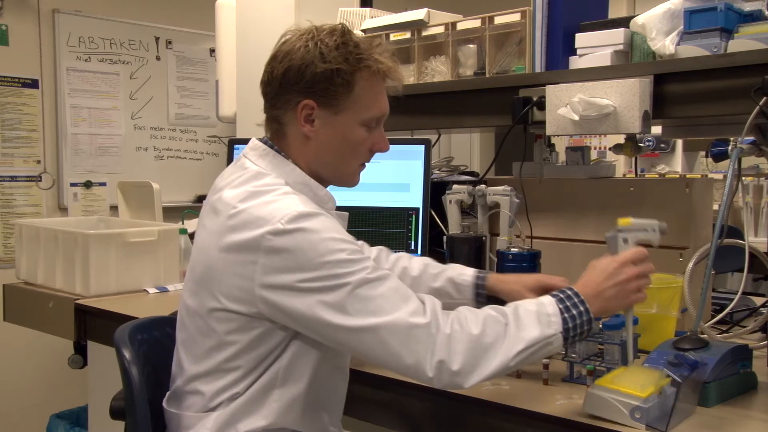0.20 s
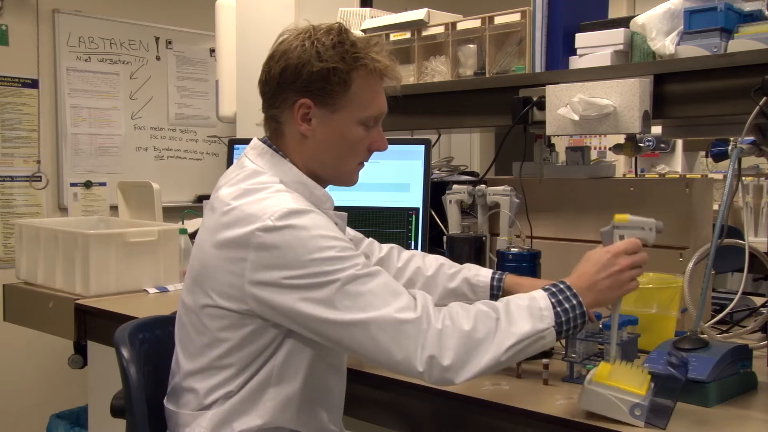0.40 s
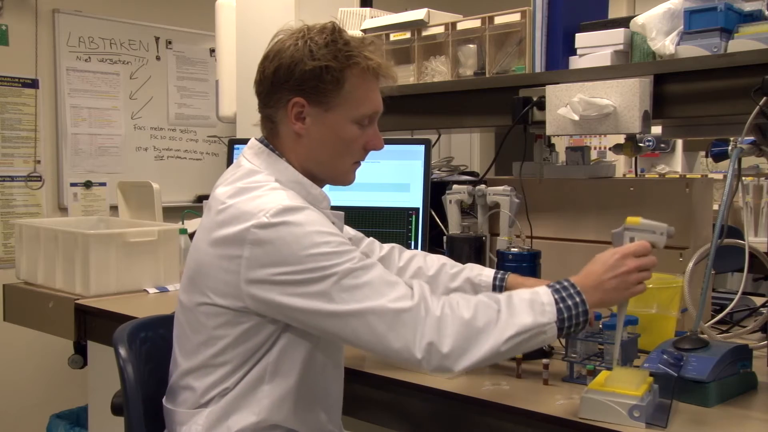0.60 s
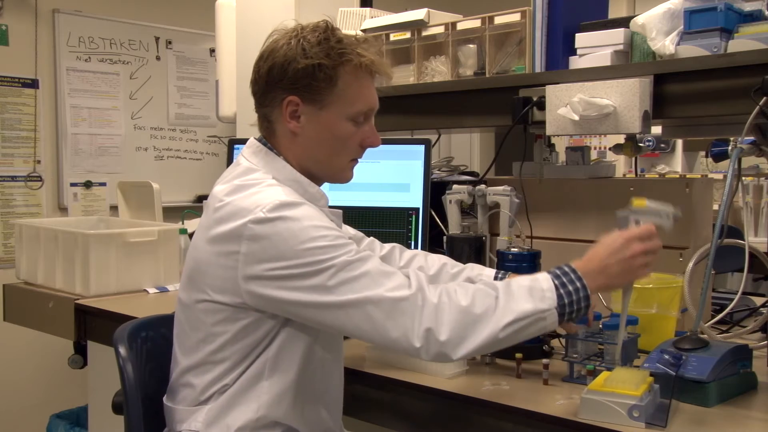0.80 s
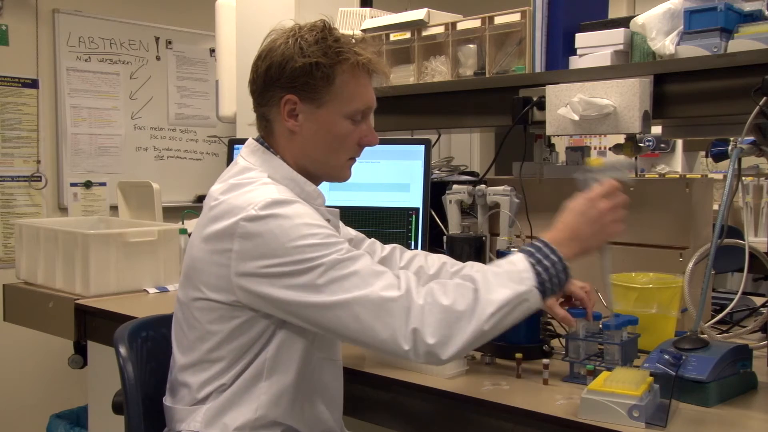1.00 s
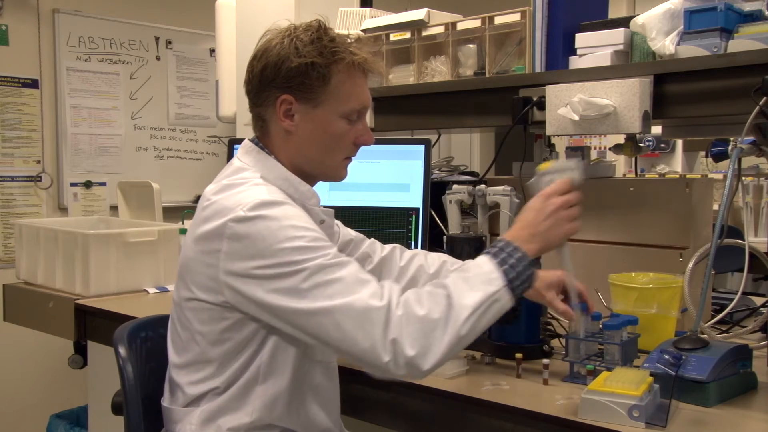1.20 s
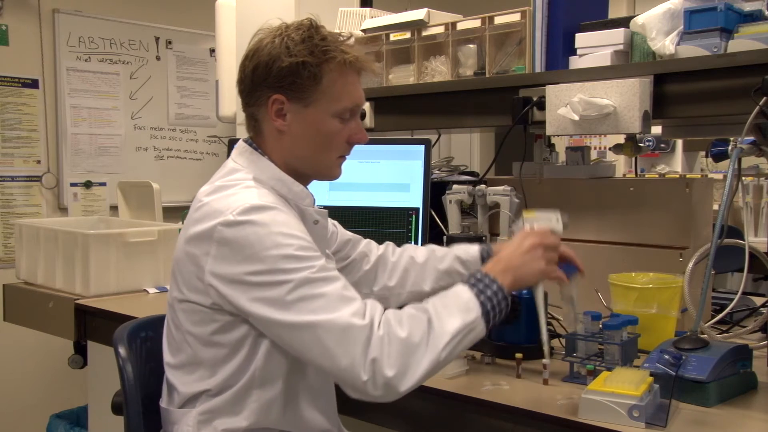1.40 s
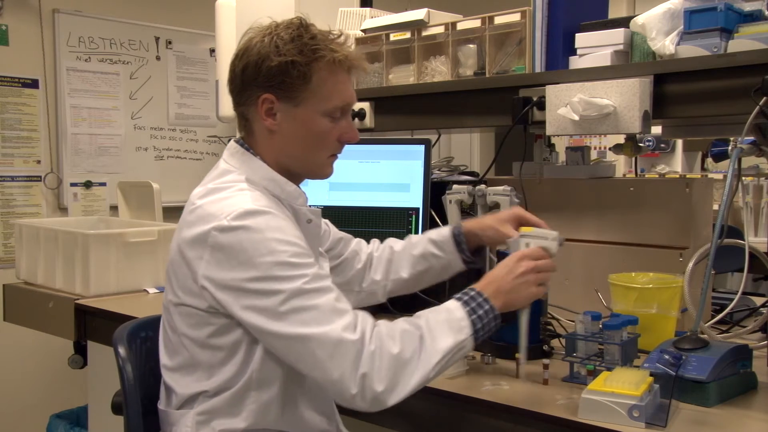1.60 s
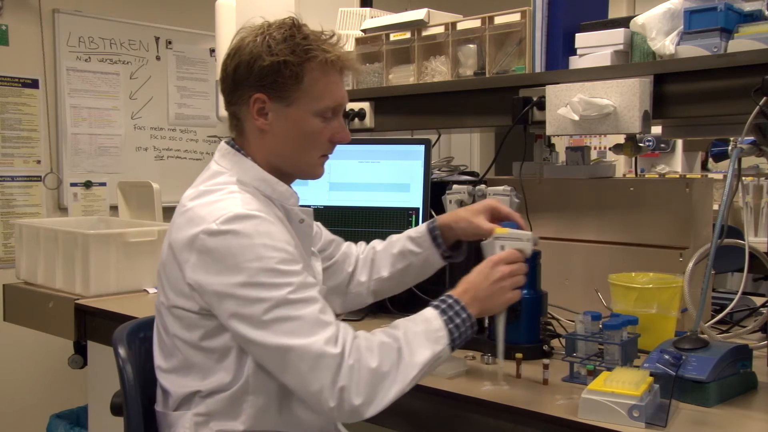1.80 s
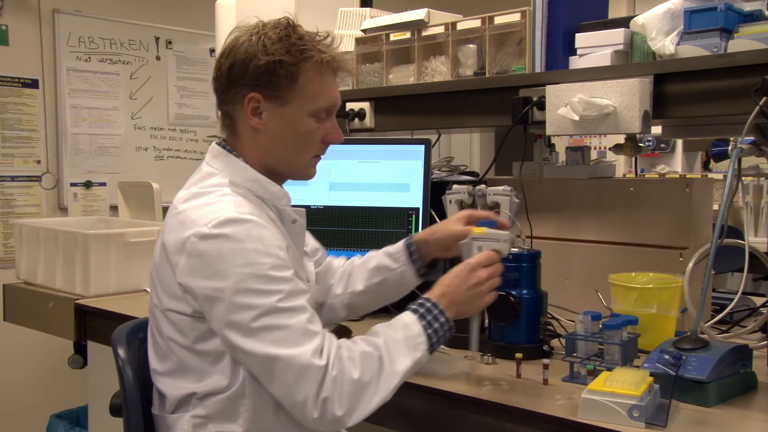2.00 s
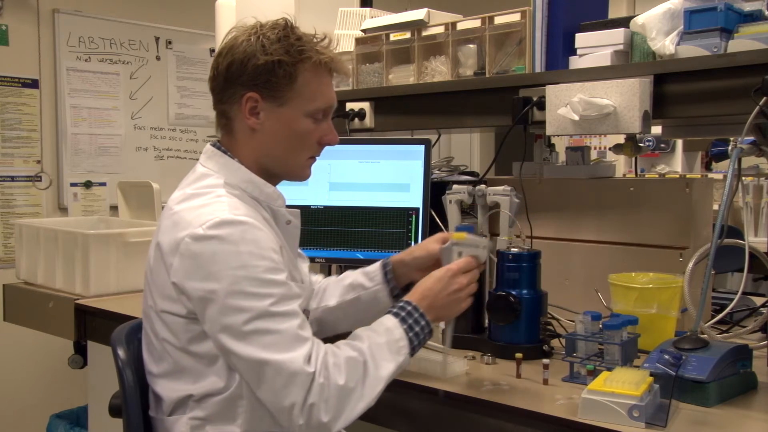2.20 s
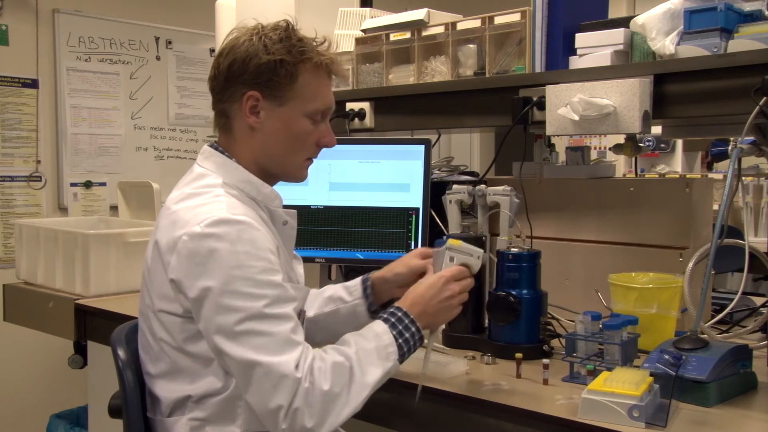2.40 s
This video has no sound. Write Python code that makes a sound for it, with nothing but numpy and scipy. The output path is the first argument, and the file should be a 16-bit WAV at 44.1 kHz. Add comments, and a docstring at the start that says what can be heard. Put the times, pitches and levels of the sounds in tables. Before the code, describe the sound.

A pipette knocks and rattles into a hollow plastic tip rack, then small ticks over equipment hum

```python
"""A lab bench in a small room: a pipette is pressed into a plastic tip rack, which knocks, rattles and settles.
Struck modes ring the rack and coloured noise clatters over them; two hollow taps follow as the tip is lifted.
The pipette ticks and scrapes in the hands, with soft bumps and rustling sleeves of swelling noise.
Lab equipment hums over ventilation noise; two close microphone ports hear it all."""
import sys
import numpy as np
from scipy import signal
from scipy.fft import rfft, irfft
from scipy.io import wavfile
from scipy.ndimage import uniform_filter1d

SR = 44100
rng = np.random.default_rng(int(sys.argv[2]) if len(sys.argv) > 2 else 0)


def wrap_up_sound(samples):
    """Save the sound to the file named by the first command line argument, as 16-bit audio."""
    columns = np.atleast_2d(samples).T
    # keep every value between -1 and 1, then stretch to whole-number steps
    tamed = np.clip(columns, -1, 1)
    steps = np.round(tamed * 32767).astype(np.int16)
    wavfile.write(sys.argv[1], SR, steps)


N = 110250  # 2.5 s

# colours of the dense plastic resonances, low and middle range: freq_hz, relative level_db (per Hz)
CLATTER_COLOUR = [(40, -45), (120, -24), (280, -12), (480, -9), (640, -1.5), (1000, -3), (1250, -16.5),
                  (1500, -16), (2200, -40), (8000, -85)]
CRACK_COLOUR = [(100, -62), (900, -39), (1450, 4), (1950, -0.5), (2400, 4.5), (3800, 1), (4300, -4),
                (4700, -14), (7000, -26), (15000, -76)]
ATTACK_S = 0.00027  # shortest rise of any blow
LEFT_RIGHT = np.array([[1], [-1]])  # puts a signal in opposite polarity on the two sides


def undb(db):
    """Amplitude factor from decibels."""
    return 10 ** (np.asarray(db) / 20)


def curve(points):
    """Gain at each frequency, drawn through (Hz, dB) points on a log frequency scale."""
    hz, db = np.array(points, float).T
    bins_hz = np.arange(N // 2 + 1) * SR / N
    return undb(np.interp(np.log(bins_hz + 1), np.log(hz), db))


def filtered(x, points):
    """A signal shaped by a gain curve."""
    return irfft(rfft(x) * curve(points), N)


def noise(points):
    """Noise of a given colour, rms 1."""
    x = filtered(rng.standard_normal(N), points)
    return x / x.std()


def wide(points, side_db):
    """Noise that partly differs between left and right."""
    middle, side = noise(points), undb(side_db) * noise(points)
    return (middle + side * LEFT_RIGHT) / np.sqrt(1 + undb(side_db) ** 2)


def since(start_s):
    """Seconds since a moment, zero before it."""
    return np.maximum(np.arange(N) / SR - start_s, 0)


def fade(t, t60_s):
    """Exponential decay by 60 dB in t60_s."""
    return np.exp(-np.log(1000) * t / t60_s)


def blow(start_s, hold_s, t60_s):
    """Envelope of a blow: quick attack, hold while the parts touch, then decay."""
    t = since(start_s)
    return np.minimum(t / ATTACK_S, 1) * fade(np.maximum(t - hold_s, 0), t60_s)


def ring(start_s, hz, t60_s):
    """One struck mode: a decaying sine, followed down to -60 dB."""
    out = np.zeros(N)
    i = np.arange(int(start_s * SR) + 1, min(int((start_s + t60_s) * SR), N))
    t = i / SR - start_s
    out[i] = np.sin(2 * np.pi * hz * t) * fade(t, t60_s)
    return out


def modes(start_s, table, rise_s):
    """Struck modes that build up while the contact lasts."""
    ringing = sum(undb(db) * ring(start_s, hz, t60_s) for hz, db, t60_s in table)
    return ringing * np.minimum(since(start_s) / max(rise_s, ATTACK_S), 1)


def swells(rows, colour):
    """Soft rubbing: coloured noise that swells and dies away in bell-shaped bursts."""
    t = np.arange(N) / SR
    bursts = sum(undb(db) * np.exp(-((t - centre_s) / half_s) ** 2) for centre_s, half_s, db in rows)
    return noise(colour) * bursts


def equipment():
    """A motor tone whose level wavers slightly and a faint mains hum, over broadband ventilation."""
    # colour of the ventilation: freq_hz, relative level_db (per Hz)
    air_colour = [(15, -2), (30, -18), (52, 1.5), (75, -9.5), (105, 2.5), (160, -7.5), (250, -10.5),
                  (430, -11.5), (600, -15.5), (1000, -23), (2000, -31.5), (4000, -41), (6300, -41.5),
                  (8000, -47), (10500, -44.5), (15500, -49.5)]
    # part of the ventilation that differs between left and right: freq_hz, gain_db
    air_side_gain = [(25, -13), (60, -14), (125, -20), (250, -24), (1000, -35), (4000, -14.5), (10000, -6)]
    motor_hz, motor_db, waver_db = 216.55, -47.5, 0.38  # levels and waver are rms
    mains_hz, mains_db = 98, -66
    air_db = -52
    t = np.arange(N) / SR
    waver = noise([(2, 0), (8, -15), (30, -80)])  # slow random drift
    motor = undb(motor_db + waver_db * waver) * np.sin(2 * np.pi * motor_hz * t)
    mains = undb(mains_db) * np.sin(2 * np.pi * mains_hz * t)
    air = noise(air_colour) + filtered(noise(air_colour), air_side_gain) * LEFT_RIGHT
    return np.sqrt(2) * (motor + mains) + undb(air_db) * air  # sqrt(2) turns rms into sine peak


def sleeves():
    """Cloth rubbing on cloth gives swells of broadband rustle."""
    # sleeve rustles: centre_s, half_length_s, level_db
    rustle_rows = [(0.13, 0.21, -55.5), (0.37, 0.068, -62), (1.34, .05, -77), (2.085, 0.037, -65),
                   (2.28, 0.58, -66)]
    # colour of the cloth: freq_hz, relative level_db (per Hz)
    cloth_colour = [(300, 18), (900, 13), (2000, 7), (4000, 0.5), (6500, -1), (8000, -5.5), (10500, 1.5),
                    (15500, -23)]
    return swells(rustle_rows, cloth_colour)


def rack():
    """Knocks ring the box, lid and tip tray and shake the loose tips; thuds and a bench boom lie beneath."""
    # knocks: start_s, box_db, lid_db, tray_db, clatter_db, crack_db, snap_db, contact_s
    knock_rows = [(0.142, -52, -62, -42.5, -52, -64, -68, 0.015),
                  (0.203, -60, -67, -42, -43.5, -55.5, -56, .003),
                  (0.2234, -37.5, -61, -61, -41, -62.5, -85, 0.007),
                  (0.4243, -33, -40, -34.5, -32, -45, -58.5, 0.0092),
                  (0.4722, -33, -17.5, -20.5, -26.5, -28, -37, 0.006),
                  (0.4978, -34, -40, -22.5, -29, -37, -44, 0.013),
                  (0.518, -29, -37, -28, -34.5, -48.5, -55, 0.026),
                  (0.5652, -34.5, -33, -32.5, -26.5, -40.5, -41.5, 0.0024),
                  (0.581, -53, -46, -46, -37, -50, -44, 0.004),
                  (0.592, -40.5, -53, -48, -41.5, -49, -57.5, 0.015),
                  (0.626, -36.5, -50, -50, -36, -49.5, -52, 0.0046),
                  (0.639, -43.5, -55, -43, -44, -58, -59, 0.0017),
                  (0.658, -43.5, -48, -65, -52, -55, -82, 0.0022)]
    # modes of the hollow box, of its lid and of the tray that holds the tips: pitch_hz, level_db, t60_s
    box_modes = [(438.5, -10.5, .22), (575.8, 3.5, 0.2), (647, -7.5, 0.57), (795, -12.5, 0.42),
                 (1049, -9.5, 0.37)]
    lid_modes = [(619, -2.5, 0.14), (715, -8, 0.18), (769, -16, 0.21), (2960, -8.5, 0.063),
                 (4190, -8.5, 0.049)]
    tray_modes = [(939.6, -1, 0.088), (969.6, -7.5, 0.3), (1093, -6.5, 0.12), (1191, -6.5, 0.1),
                  (1295, -10.5, 0.095), (2247, -19, 0.19)]
    # colour of the brightest plastic resonances: freq_hz, relative level_db (per Hz)
    snap_colour = [(300, -60), (3200, -14), (4700, -0.5), (6800, 2.5), (7700, -8.5), (9500, -4),
                   (11500, -13), (13500, -15), (15500, -37)]
    # colour of the bench boom: freq_hz, relative level_db (per Hz)
    bench_colour = [(30, -16), (60, -7), (100, 2.5), (160, -2), (280, 2), (400, -22), (700, -34),
                    (5000, -86)]
    # thuds into the bench as the tip seats: start_s, level_db, pitch_hz, t60_s
    thud_rows = [(0.475, -32, 313, 0.024), (0.5654, -17.5, 820, 0.017)]
    clatter_t60_s, crack_t60_s, snap_t60_s = 0.056, 0.068, 0.06
    bench_start_s, bench_db, bench_t60_s = 0.54, -43.5, 0.81
    out = np.zeros((2, N))
    clatter, crack = noise(CLATTER_COLOUR), noise(CRACK_COLOUR)
    snap = wide(snap_colour, -13)
    for start_s, box_db, lid_db, tray_db, clatter_db, crack_db, snap_db, contact_s in knock_rows:
        out += undb(box_db) * modes(start_s, box_modes, contact_s)
        # lid and tray build up twice as fast as the box
        out += undb(lid_db) * modes(start_s, lid_modes, contact_s / 2)
        out += undb(tray_db) * modes(start_s, tray_modes, contact_s / 2)
        out += undb(clatter_db) * clatter * blow(start_s, contact_s, clatter_t60_s)
        out += undb(crack_db) * crack * blow(start_s, contact_s, crack_t60_s)
        out += undb(snap_db) * snap * blow(start_s, contact_s, snap_t60_s)
    out += undb(bench_db) * noise(bench_colour) * blow(bench_start_s, 0, bench_t60_s)
    thuds = sum(undb(db) * ring(start_s, hz, t60_s) for start_s, db, hz, t60_s in thud_rows)
    return out - thuds  # the thuds first swing negative


def pipette_ticks():
    """Small contacts in the pipette: short dry noise bursts that also ping its shell."""
    # ticks: start_s, clatter_db, crack_db, snap_db, ping_db
    tick_rows = [(0.6826, -60, -53, -51, -75), (0.7531, -60, -58, -55.5, -55), (0.82, -60, -67, -63.5, -75),
                 (0.9125, -58, -64, -57, -68), (0.919, -47.5, -63.5, -59.5, -67),
                 (1.1503, -50, -66, -54, -72), (1.1732, -64, -72, -67, -78), (1.2217, -46, -62.5, -66, -78),
                 (1.289, -75, -62, -63, -62), (1.9796, -53.5, -60.5, -67, -58.5),
                 (2.0531, -55, -53, -54, -50), (2.083, -77, -56, -72, -61), (2.1, -56, -62, -81, -72),
                 (2.255, -68, -64, -74, -57), (2.271, -51, -56.5, -59.5, -59),
                 (2.4521, -59, -59.5, -63, -70)]
    # colour of the bright edge of a tick: freq_hz, relative level_db (per Hz)
    edge_colour = [(300, -51), (3200, -12), (4700, 3.5), (6800, 3.5), (8000, -4), (9800, 2.5), (12500, -5),
                   (15500, -5)]
    # modes of the pipette's shell: pitch_hz, level_db, t60_s
    shell_modes = [(3020, -10, 0.072), (3910, 2.5, 0.026)]
    hold_s, t60_s = 0.0014, 0.021
    colours = [noise(CLATTER_COLOUR), noise(CRACK_COLOUR), noise(edge_colour)]
    out = np.zeros(N)
    for start_s, *levels_db, ping_db in tick_rows:
        burst = sum(undb(db) * colour for db, colour in zip(levels_db, colours))
        out += blow(start_s, hold_s, t60_s) * burst
        out += undb(ping_db) * modes(start_s, shell_modes, hold_s)
    return out


def scrapes():
    """Loose plastic parts rub on each other in the grip, in short uneven grains."""
    # scrapes: centre_s, half_length_s, level_db
    scrape_rows = [(0.88, 0.016, -69), (1.345, 0.051, -65.5), (2.085, 0.038, -69), (2.28, .04, -73.5),
                   (2.38, 0.012, -71)]
    # colour of rubbed plastic: freq_hz, relative level_db (per Hz)
    scrape_colour = [(1200, -16), (2400, -8), (3000, -3), (3450, -4), (3950, -3), (4700, -3), (7000, -11),
                     (12000, -16)]
    grain_db, grain_s = 2.5, 0.0037  # rms unevenness, smoothing length
    grain = uniform_filter1d(rng.standard_normal(N), max(int(grain_s * SR), 2))
    rough = undb(grain_db * grain / grain.std())
    return swells(scrape_rows, scrape_colour) * rough / np.sqrt(np.mean(rough ** 2))


def hand_bumps():
    """Hands shifting on the grip make soft, dull swells."""
    # bumps: centre_s, half_length_s, level_db
    bump_rows = [(0.91, 0.044, -57), (1.365, 0.037, -56), (1.9, 0.024, -52), (2.405, 0.018, -51)]
    # colour of the grip: freq_hz, relative level_db (per Hz)
    grip_colour = [(200, -67), (350, -4.5), (430, 3), (600, -8.5), (1000, -24), (2500, -48), (12000, -80)]
    return swells(bump_rows, grip_colour)


def tip_taps():
    """The lifted tip taps twice; each tap blooms gradually into the same hollow note."""
    # taps: start_s, level_db
    tap_rows = [(1.1518, -37.5), (1.2225, -34.5)]
    pitch_hz, t60_s, rise_s = 824, 0.14, 0.0074
    out = np.zeros(N)
    for start_s, db in tap_rows:
        bloom = 1 - np.exp(-since(start_s) / rise_s)
        out += undb(db) * ring(start_s, pitch_hz, t60_s) * bloom
    return out


def room(x):
    """Shelves and walls return a short diffuse tail of decaying noise, wider in the treble."""
    tail_db, delay_s, t60_s, spread_db = -15, 0.012, 0.51, -18
    tail = blow(delay_s, 0, t60_s)
    middle = rng.standard_normal(N)
    side = filtered(rng.standard_normal(N), [(500, -37), (3000, -3)])
    diffuse = middle + undb(spread_db) * side * LEFT_RIGHT
    response = tail * diffuse / np.sqrt(np.sum(tail ** 2))
    return x + undb(tail_db) * signal.fftconvolve(x, response, axes=1)[:, :N]


def scene():
    """Handling sounds excite the room; the equipment is added without the room tail."""
    handling = sleeves() + rack() + pipette_ticks() + scrapes() + hand_bumps() + tip_taps()
    return room(handling) + equipment()


def record(dry):
    """The left port leads in phase, each port has its own colour, and a steep low-pass cuts the top."""
    # level of left minus right: freq_hz, difference_db
    port_balance = [(60, -0.5), (220, -1.1), (700, -0.5), (1290, -2.5), (2000, 0), (2800, 1), (4400, 0.4),
                    (15000, 0.3)]
    # phase by which the left port leads: freq_hz, phase_rad
    port_phase = [(0, 0), (1000, .27), (2670, .62), (4700, 1.6), (6500, 1.25), (9000, 1.7), (11200, 2.55),
                  (13000, 2.9), (16000, 2.75)]
    top_hz = 15900
    hz = np.arange(N // 2 + 1) * SR / N
    lead_rad = np.interp(hz, *np.array(port_phase).T)
    # each port takes half of the difference, in opposite directions
    half = np.sqrt(curve(port_balance)) * np.exp(.5j * lead_rad)
    ports = irfft(rfft(dry) * np.array([half, 1 / half]), N)
    low_pass = signal.ellip(8, .2, 70, top_hz, fs=SR, output="sos")
    return signal.sosfilt(low_pass, ports)


dry = scene()
out = record(dry)
wrap_up_sound(out)
```